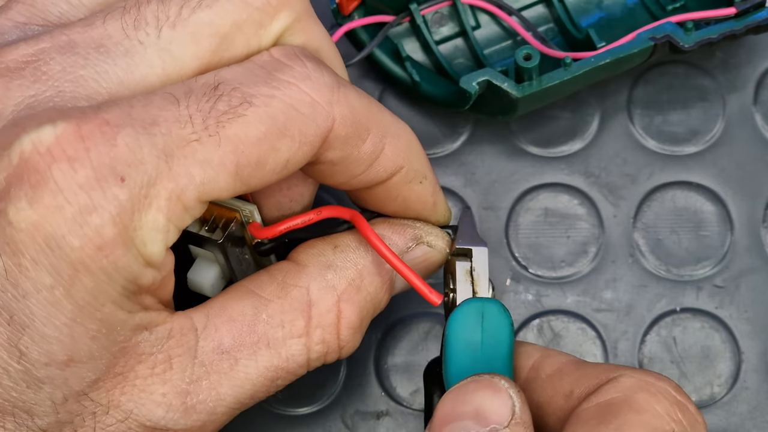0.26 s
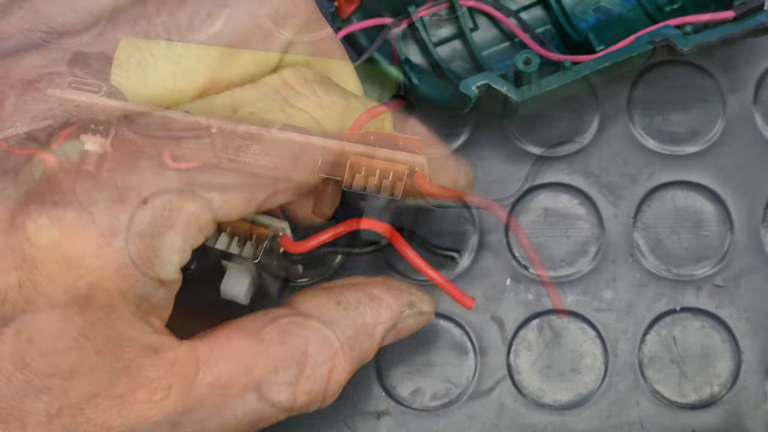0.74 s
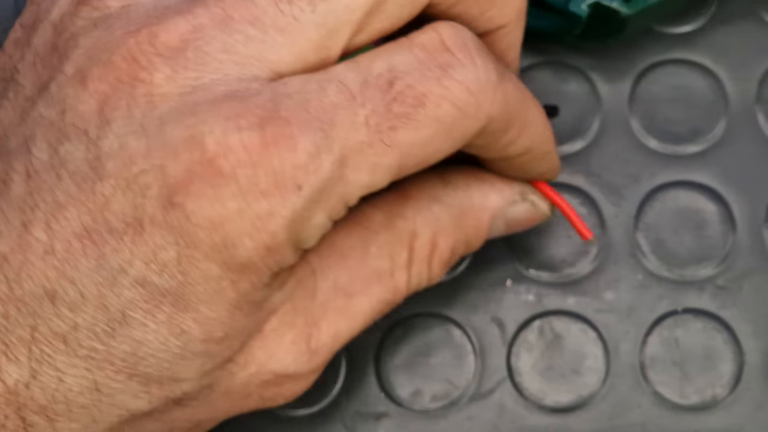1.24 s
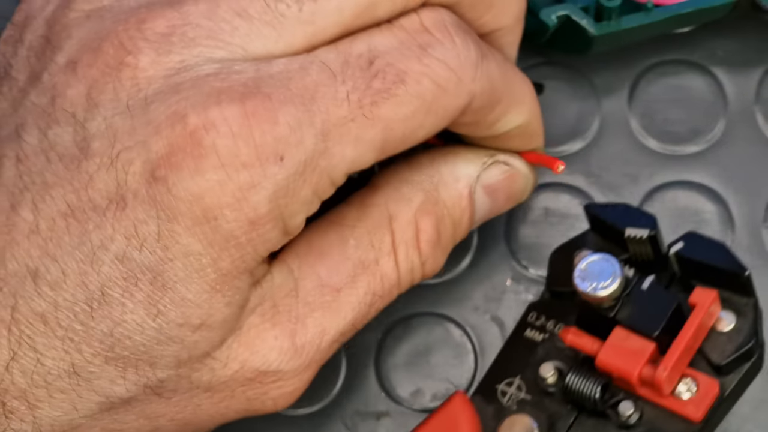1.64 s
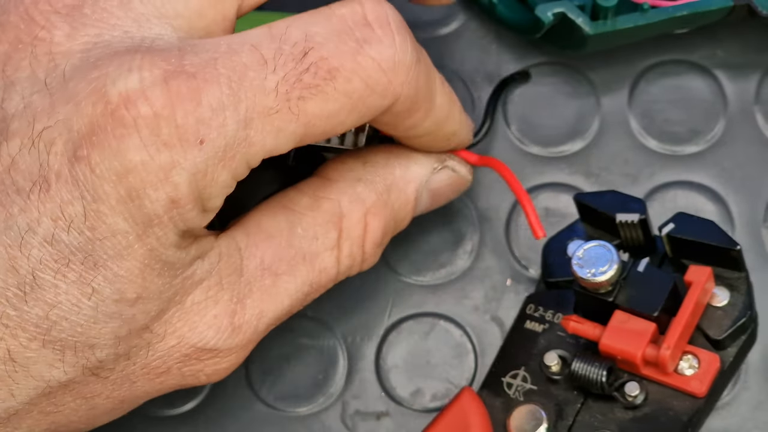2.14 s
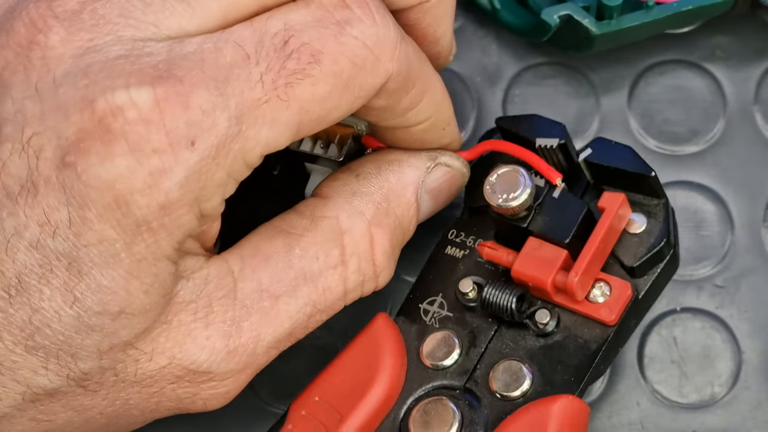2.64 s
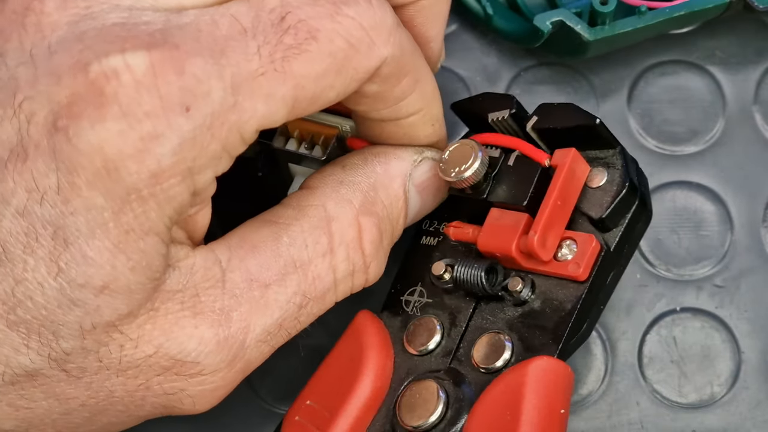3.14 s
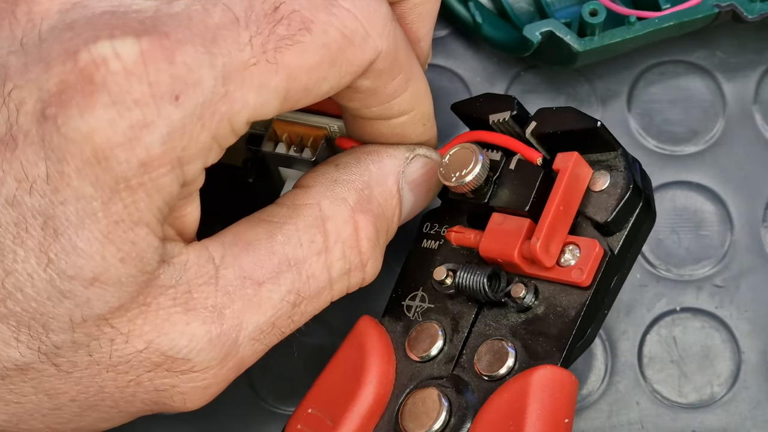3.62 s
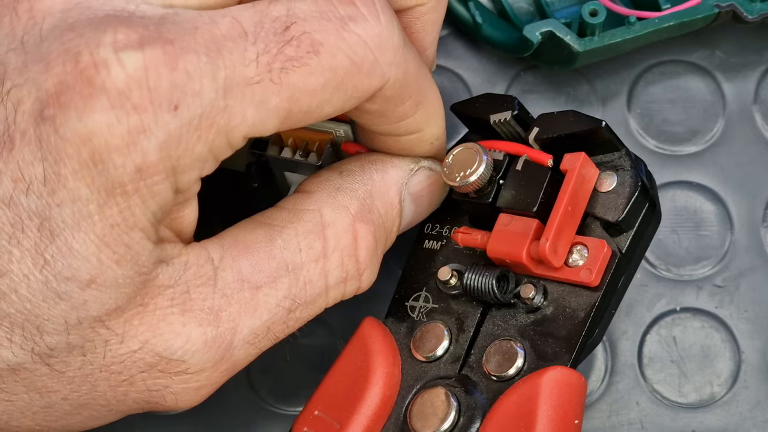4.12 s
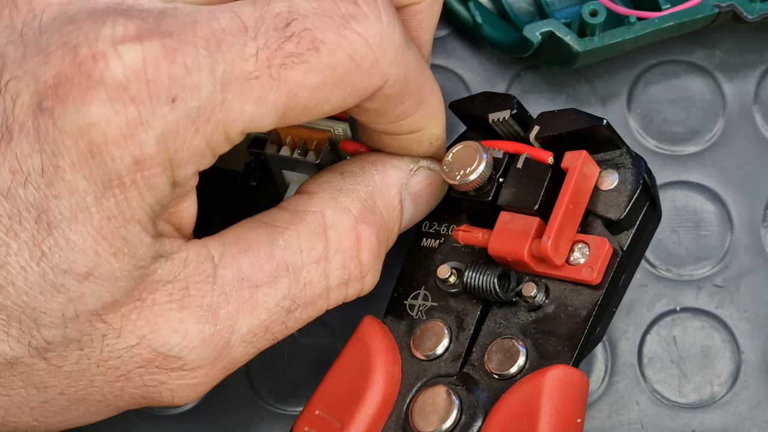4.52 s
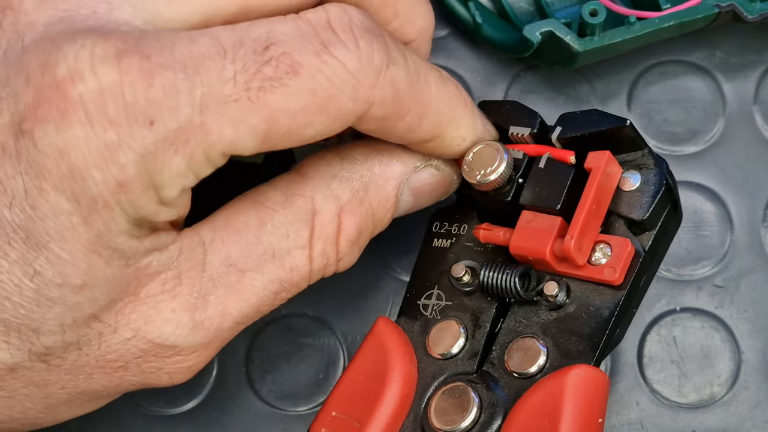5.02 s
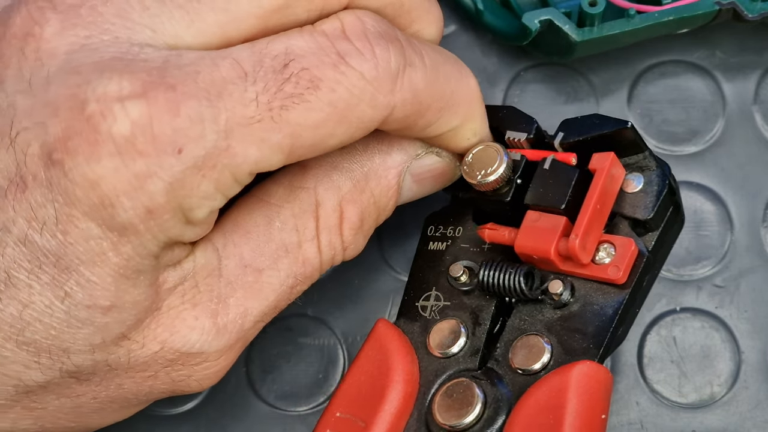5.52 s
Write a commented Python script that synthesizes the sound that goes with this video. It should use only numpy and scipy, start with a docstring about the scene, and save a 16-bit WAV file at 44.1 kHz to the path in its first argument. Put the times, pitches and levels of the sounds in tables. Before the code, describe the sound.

A close stereo recording at a workbench in a small, hard, reverberant room, with a steady low hum, slightly wavering and throbbing, and faint air noise. At about 0.4 s side cutters bite through a lead: a tight, very bright steel snap with a short ringing tail. A dull low thud follows near 0.75 s. From about 1 to 2 s, hands and wire rub over a rubber mat, strongest around 1.4 s, with short scrapes, soft low bumps and light ticks; a firmer tick comes at 1.8 s. Sparse small contacts continue until the stripper's jaws snap shut loudly at 3.1 s. A very faint, thin, gliding two-tone squeal runs from 4.4 to 5 s with slight hand rubbing. Little spring pings sound at 5.0, 5.2 and 5.3 s. At 5.6 s the mechanism releases in a rapid metallic clatter with a low thump and a last click. Loud snaps momentarily pull the background down.

```python
"""Close at a workbench in a small, hard-walled room with a low hum, side cutters snip a lead: hard, ringing noise bursts.
Hands then shift over the rubber mat, with filtered rubbing, low thuds and light ticks, and bring up a wire stripper.
Its jaws snap onto the wire, the insulation squeals in two gliding tones, the spring pings in decaying modes,
and the mechanism lets go with a clatter; each loud snap pulls the recorder's gain down, and it creeps back."""
import sys
import numpy as np
from scipy import signal
from scipy.fft import rfft, irfft, next_fast_len
from scipy.io import wavfile
from scipy.ndimage import uniform_filter1d, map_coordinates

SR = 44100
rng = np.random.default_rng(int(sys.argv[2]) if len(sys.argv) > 2 else 0)


def store_pcm(level_fs):
    """Save levels as 16-bit WAV."""
    pcm = np.round(np.clip(level_fs, -1, 1) * 32767).astype(np.int16)
    wavfile.write(sys.argv[1], SR, np.atleast_2d(pcm).T)


N = 254456  # length in samples

# resonances of the stripper's frame, also heard in light contacts: [f/Hz, width/Hz, level/dB]
FRAME_MODES = [(1340, 84, -9), (2270, 160, -3), (3653, 100, -1.5), (4984, 99, -8.5), (6260, 50, -3.5),
               (7330, 110, 3.5), (8800, 200, -3), (11700, 110, -15.5), (13330, 230, -22.5)]
# likeness of left and right microphone for near sounds: [f/Hz, correlation 0-1]
NEAR_LIKENESS = [(300, 0.8), (1000, 0.86), (2500, .45), (5000, 0), (15000, 0.18)]


def amp(db):
    """Amplitude factor of a level in dB."""
    return 10 ** (np.asarray(db) / 20)


def unit(x):
    """Scale to rms 1."""
    return x / np.sqrt(np.mean(x ** 2) + 1e-20)


def along(points, hz):
    """Read a curve of (Hz, value) points on a logarithmic frequency axis."""
    f, v = np.transpose(points)
    return np.interp(np.log(hz + 1), np.log(f + 1), v)


def curves(rows):
    """One value per sample for each column after the time."""
    s, *cols = np.transpose(rows)
    return [np.interp(np.arange(N) / SR, s, c) for c in cols]


def wobble(rate):
    """A smooth random curve with `rate` random values a second."""
    knots = np.arange(0, N * rate / SR + 1, 1 / 8)
    values = rng.standard_normal(int(knots[-1]) + 4)
    smooth = map_coordinates(values, [knots])
    return np.interp(np.arange(N) * rate / SR, knots, smooth)


def between(start, end, fade):
    """A gate with soft edges, all in seconds."""
    t = np.arange(N) / SR
    return np.clip((t - start) / fade, 0, 1) * np.clip((end - t) / fade, 0, 1)


def swell(peak_s, rise_db_per_s, fall_db_per_s):
    """A movement that grows to its height (gain 1) and ebbs away."""
    t = np.arange(N) / SR - peak_s
    return amp(np.minimum(rise_db_per_s * t, -fall_db_per_s * t))


def jerks(rate, life, size):
    """Stick-slip: sudden random slips, `rate` a second, that each die away over `life` s; rms 1."""
    slips = rng.exponential(size=size) * (rng.random(size) < rate / SR)
    return unit(signal.lfilter([1], [1, -np.exp(-1 / (life * SR))], slips))


def bell(hz, centre, width):
    """Magnitude of one resonance."""
    return 1 / np.sqrt(1 + (2 * (hz - centre) / width) ** 2)


def noise(colour, alike, size):
    """Stereo noise of rms 1 with gain colour(Hz); mid and side shares set the likeness of the channels."""
    m = next_fast_len(size)
    hz = np.fft.rfftfreq(m, 1 / SR)
    turn = np.arccos(np.clip(along(alike, hz), -1, 1)) / 2
    shares = [np.cos(turn), np.sin(turn)]
    spectra = rfft(rng.standard_normal((2, m))) * colour(hz) * shares
    mid, side = irfft(spectra, m)[:, :size]
    return unit(np.array([mid + side, mid - side]))


def rush(spectrum, size=N):
    """Diffuse noise with a given spectrum, arriving from all around the microphones."""
    # likeness of left and right for diffuse sound: [f/Hz, correlation 0-1]
    diffuse_likeness = [(30, .7), (100, 0.74), (300, 0.73), (800, 0.032), (2000, 0), (15000, 0.046)]
    return noise(lambda hz: amp(along(spectrum, hz)), diffuse_likeness, size)


def panned(pan_db):
    """Left and right gains; positive leans left."""
    return amp([[pan_db / 2], [-pan_db / 2]])


def add(out, x, s):
    """Mix x into out from time s on."""
    i = max(round(s * SR), 0)
    out[:, i:i + x.shape[-1]] += x[..., :max(N - i, 0)]


def contacts(rows, spectrum, resonances, gain_db, rise, body_db, halo_db):
    """Steel parts knock together and ring out, damped by the hand: shaped, coloured noise."""
    out, lead = np.zeros((2, N)), 1 / 30
    t = np.arange(SR // 8) / SR - lead
    for s, db, ring_hz, ring_db, knock_db, sizzle_db, pan_db, t60 in rows:
        def colour(hz):
            modes = sum(amp(level) * bell(hz, f, width) ** 2 for f, width, level in resonances)
            body = 1 + amp(body_db) * modes
            ring = 1 + amp(ring_db) * bell(hz, ring_hz, ring_hz * 0.22) ** 2
            knock = knock_db / (1 + (hz / 1800) ** 2)
            sizzle = sizzle_db * hz ** 6 / (hz ** 6 + 9000. ** 6)
            return amp(along(spectrum, hz)) * body * ring * amp(knock + sizzle)
        blow = np.where(t < 0, np.exp(-abs(t) / rise), amp(-60 * abs(t) / t60))
        # a short soft-edged swell of noise around each sharp blow
        halo = np.exp(-abs(t) / np.where(t < 0, .003, .006))
        shape = np.hypot(blow, amp(halo_db) * halo)
        burst = shape * noise(colour, NEAR_LIKENESS, len(t))
        # give both channels the energy of the shape before panning
        burst *= np.linalg.norm(shape) / np.linalg.norm(burst, axis=1, keepdims=True)
        add(out, amp(db + gain_db) * panned(pan_db) * burst, s - lead)
    return out


def echo(s, db, spectrum, pan_db):
    """The room's diffuse answer to a snap: noise that decays by band, the top treble soonest."""
    # reverberation time of the room: [f/Hz, t60/s]
    room_decay = [(500, 0.62), (2000, 0.78), (4300, 0.72), (6000, 0.66), (9000, 0.58), (15000, 0.13)]
    out = np.zeros((2, N))
    hz, t, z = signal.stft(rush(spectrum, size=SR), SR, nperseg=256)
    decay = amp(-60 * t / along(room_decay, hz)[:, None])
    onset = 1 - np.exp(-t / 0.0045)
    tail = signal.istft(z * decay * onset, SR, nperseg=256)[1]
    add(out, amp(db) * panned(pan_db) * tail, s)
    return out


def cutters():
    """The blades bite through the lead and meet: contacts coloured by the steel, then the room."""
    # contacts of the snip: [t/s, relative level/dB, ring f/Hz, ring lift/dB, knock lift/dB, sizzle lift/dB,
    # left minus right/dB, t60/s]
    snip_contacts = [(.4305, -14, 5530, 5.5, -10.5, -4, 12, 0.03),
                     (.4333, -8, 4660, 4.5, -4.5, -2, 17.5, 0.028),
                     (.4364, -2.5, 5550, -1, -7, 3, 12.5, 0.016), (.4408, -1, 4820, -6, 10, 6, -2, 0.0072)]
    # colour of the snip close up: [f/Hz, level/dB]
    snip_colour = [(88, -51), (150, -21.5), (1020, -23), (1450, -17.5), (2270, -8.5), (2870, -18.5),
                   (5460, -7), (6140, -13.5), (8070, -11.5), (8730, -2.5), (9820, -27.5), (12700, -14.5),
                   (15100, -26), (16000, -29)]
    # resonances of the blades: [f/Hz, width/Hz, level/dB]
    blade_modes = [(2550, 130, -8), (4218, 150, -1), (4875, 130, 3), (5532, 430, 4.5), (8530, 200, -1),
                   (10400, 310, -0.5), (15080, 335.7, 3)]
    # colour of the room's answer: [f/Hz, level/dB]
    snip_echo = [(240, -50), (400, -20), (481, -31), (579, -15), (655, -22), (906, -21.5), (1400, -18.5),
                 (2020, -8.5), (2670, -15.5), (4310, -2.5), (5690, -11.5), (8110, -12), (12900, -15),
                 (14600, 2), (16000, -27)]
    snip = contacts(snip_contacts, snip_colour, blade_modes,
                    gain_db=5.5, rise=0.00054, body_db=0.5, halo_db=-11.5)
    return snip + echo(.44, -6.0, snip_echo, pan_db=1)


def stripper():
    """The jaws clamp the wire; later the levers fly back, and both blows excite frame and room."""
    # contacts of the closing jaws, then of the release: [t/s, relative level/dB, ring f/Hz, ring lift/dB,
    # knock lift/dB, sizzle lift/dB, left minus right/dB, t60/s]
    grip_contacts = [(3.1045, -11.5, 2300, 10, -8, -3.5, 5.7, 0.01),
                     (3.106, -7.5, 2424, 33, -3, -3, 1, 0.0098),
                     (3.1098, -10.5, 4900, 4, 0.5, -8.5, 5.9, 0.018),
                     (3.113, -6, 3740, 1.6, 2.5, 2.5, 5, 0.031)]
    release_contacts = [(5.6233, -2.5, 6213, 15.2, 0.5, -3, 2.7, .013),
                        (5.635, -12.5, 2235, 3, 5.5, -2.5, 1, .018),
                        (5.6385, -8, 5155, 8, -3.5, -2, 7, .012), (5.6453, -4.5, 7850, 2, 1, 7, 2, 0.018),
                        (5.6495, -10, 3206, 6.7, 1.5, -1, 3.6, 0.022),
                        (5.6575, -10, 3520, 4.85, -2, -1.5, 2.7, 0.024)]
    # colours of jaws and levers close up: [f/Hz, level/dB]
    jaw_colour = [(88, -59.5), (150, -35.5), (716, -16), (941, -20.5), (1340, -7), (1870, -21.5),
                  (2450, -5.5), (2760, -11), (3770, -5.5), (7180, -4.5), (11300, -19), (14800, -14.5),
                  (16000, -17)]
    lever_colour = [(180, -46), (300, -25), (961, -14.5), (1230, -8), (1690, -3.5), (1870, -9.5),
                    (3190, -8), (3950, -13), (5430, -3.5), (12100, -13.5), (13100, -12), (15000, -11.5),
                    (16000, -19.5)]
    # colours of the room's answers to them: [f/Hz, level/dB]
    grip_echo = [(350, -67), (600, -26.5), (931, -27.5), (1260, -18.5), (1680, -17), (2070, -6), (2540, -6),
                 (4520, -9), (5710, -14), (7410, -11.5), (12000, -23), (14700, -12.5), (16000, -28)]
    release_echo = [(350, -45), (600, -26), (894, -31), (1450, -5.5), (1900, -10), (2150, -3), (2650, -10),
                    (5870, -12.5), (11200, -18.5), (14100, -7.5), (15400, -18), (16000, -41.5)]
    grip = contacts(grip_contacts, jaw_colour, FRAME_MODES,
                    gain_db=7, rise=0.0011, body_db=2, halo_db=-10)
    release = contacts(release_contacts, lever_colour, FRAME_MODES,
                       gain_db=5.0, rise=0.00068, body_db=-5, halo_db=-9.5)
    grip_tail = echo(3.113, -27.0, grip_echo, pan_db=2.5)
    release_tail = echo(5.645, -22, release_echo, pan_db=1.5)
    return grip + release + grip_tail + release_tail


def spring():
    """The coil slips on its hook: a crack and decaying modes, the lowest of which sings on."""
    # slips of the spring: [t/s, relative level/dB, tilt/(dB per octave), singing level/dB]
    pings = [(4.996, -22, -4.5, -51), (5.2031, -27, 2.5, -39), (5.309, -42.5, -5, -46.5)]
    # modes of the coil: [f/Hz, level before tilt and scatter/dB, t60/s]
    coil_modes = [(1686, -11, .09), (2360, -10.5, .06), (2510, -12.5, .06), (3430, -4.5, .03),
                  (3532, -1, 0.05), (3720, 0.5, 0.018), (4210, -11.5, 0.019), (4780, -16.5, 0.0499),
                  (5200, -12.5, 0.029), (5476, -9, .03), (6200, -17, 0.033), (7500, -24, .03)]
    sing_attack_s, sing_t60_s = 0.0044, 0.23
    out, sing, t = np.zeros((2, N)), np.zeros((1, N)), np.arange(SR // 2) / SR
    lowest_hz = coil_modes[0][0]
    for s, db, tilt_db, sing_db in pings:
        ring = 0
        for hz, level, t60 in coil_modes:
            mode_db = level + tilt_db * np.log2(hz / lowest_hz) + rng.normal(0, 1)
            ring = ring + amp(mode_db - 60 * t / t60) * np.sin(2 * np.pi * (hz * t + rng.random()))
        crack_noise = noise(lambda hz: bell(hz, 4100, 4500) ** 3, NEAR_LIKENESS, len(t))
        crack = amp(-10.5 - 60 * t / 0.016) * crack_noise
        onset = 1 - np.exp(-t / 0.00045)
        add(out, amp(db - 6.5) * panned(15) * (ring + crack) * onset, s)
        add(sing, amp(sing_db - 60 * t / sing_t60_s) * (1 - np.exp(-t / sing_attack_s)), s)
    tone = np.sin(2 * np.pi * np.cumsum(lowest_hz + 5 * wobble(50)) / SR)

    def buzz_colour(hz):
        return sum(amp(level) * bell(hz, f, 3.5 / t60) ** 2 for f, level, t60 in coil_modes)
    # the turns buzz against each other and keep the higher modes faintly alive
    buzz = noise(buzz_colour, NEAR_LIKENESS, N)
    return out + sing * panned(4) * (tone + amp(-11) * buzz)


def insulation():
    """The sleeve squeals faintly in two unsteady tones as it is drawn off the copper."""
    # pitch of the lower tone: [t/s, f/Hz]
    squeal_pitch = [(4.42, 5500), (4.63, 5950), (4.68, 6850), (4.72, 6950), (4.78, 6330), (4.88, 6240),
                    (4.93, 5620), (5.0, 5430)]
    squeal_db = -70
    hz, = curves(squeal_pitch)
    phase = 2 * np.pi * np.cumsum(hz * (1 + 0.00075 * wobble(90))) / SR
    level = amp(squeal_db + 2.9 * wobble(30)) * between(4.38, 5.02, .14)
    upper = amp(-8 + 3.3 * wobble(5.4)) * np.sin(1.16 * phase)
    return level * (np.sin(phase) + upper)


def ticks():
    """Tool and wire touch lightly; small parts ring higher, brighter and shorter."""
    # light contacts: [t/s, relative level/dB, ring f/Hz, ring lift/dB, knock lift/dB]
    touches = [(0.962, -30.5, 8923, 13.5, -14), (1.272, -33, 13100, 15, -16),
               (1.5057, -22.5, 6456, 5.5, -21), (1.7885, -17, 3430, 0, 19), (2.039, -30, 3400, 6.5, 4),
               (2.175, -35.5, 5680, 5, -5.5), (2.196, -32, 6350, 4, -30), (2.372, -30.5, 6000, -11, -16),
               (2.472, -37, 3020, 6, 0), (2.704, -37.5, 9000, -13, -3), (2.856, -30.5, 2980, 7.5, 0),
               (3.002, -32, 3150, 14, -3), (4.734, -31, 2980, 0, 12), (5.051, -37, 7500, 9, -9),
               (5.5218, -26.5, 5250, 32, -13.5), (5.745, -10.5, 2948, 13.5, -7)]
    # their colour close up: [f/Hz, level/dB]
    light_colour = [(200, -16), (500, -0.5), (1200, -3), (3200, 6.5), (6000, 6), (8500, -8.5),
                    (11000, -20.5), (15000, -11)]
    middling_hz, middling_t60_s = 3460, 0.054
    shortening = .55  # power of pitch by which the ring shortens
    sizzle_db_per_octave, pan_db = 6.5, 5
    rows = []
    for s, db, hz, ring_db, knock_db in touches:
        sizzle_db = sizzle_db_per_octave * np.log2(hz / middling_hz)
        t60 = middling_t60_s * (middling_hz / hz) ** shortening
        rows.append((s, db, hz, ring_db, knock_db, sizzle_db, pan_db, t60))
    return contacts(rows, light_colour, FRAME_MODES,
                    gain_db=-11, rise=0.00019, body_db=2, halo_db=-9.5)


def bench():
    """Low thuds at the bench, and a few low swells of the drone: a decaying tone with two bands of noise."""
    # low thuds and swells: [t/s, relative level/dB, f/Hz, t60/s]
    lows = [(.738, -7, 259.4, 0.078), (.745, -18.5, 105.3, 0.34), (.777, -18, 163.3, 0.26),
            (1.107, -29, 104, 0.18), (1.167, -25, 117, 0.16), (1.293, -29, 186, 0.35),
            (1.369, -29, 79.5, 0.13), (1.643, -26, 107, 0.17), (1.788, -30.5, 326, 0.12),
            (2.261, -32.5, 210.5, 0.17), (2.535, -41, 180, 0.23), (5.644, -14.5, 82, 0.16),
            (5.693, -24.5, 121, 0.25)]
    out, t = np.zeros((2, N)), np.arange(SR // 2) / SR
    onset = 1 - np.exp(-t / 0.0033)
    for s, db, low_hz, t60 in lows:
        def long_colour(hz):
            return bell(hz, low_hz, low_hz * 0.82) ** 2 * hz / (hz + 80)

        def brief_colour(hz):
            return bell(hz, low_hz * 1.1, low_hz * 0.9) ** 2
        long_noise = noise(long_colour, NEAR_LIKENESS, len(t))
        brief_noise = noise(brief_colour, NEAR_LIKENESS, len(t)) * amp(-60 * t / 0.051)
        tone = np.sin(2 * np.pi * low_hz * t)
        body = (.85 * tone + 0.74 * long_noise) * amp(-60 * t / t60)
        add(out, amp(db - 1.5) * onset * (body + brief_noise), s)
    return out


def drags():
    """The wire drags over the mat's studs, catching and slipping in quick, uneven jerks."""
    # strokes of the wire: [t/s, level/dB, length/s, f/Hz]
    strokes = [(1.29, -44, .06, 1700), (1.402, -36, .03, 1150), (1.438, -41, .026, 900)]
    out, t = np.zeros((2, N)), np.arange(SR // 5) / SR
    for s, db, length, drag_hz in strokes:
        # the stroke is strongest half a length after it starts
        stroke = 2 * t / length * np.exp(1 - 2 * t / length)
        stick_slip = unit(.5 + jerks(1500, 0.0023, size=len(t)))
        rasp = noise(lambda hz: bell(hz, drag_hz, drag_hz * 1.2) ** 3, NEAR_LIKENESS, len(t))
        add(out, amp(db) * stroke * stick_slip * rasp, s)
    return out


def hands():
    """Skin and wire rub over the mat in one sweep of grainy noise, then fingers tighten on the handles."""
    # colours of the weight on the mat, the rubbing and its hiss: [f/Hz, level/dB]
    rumble_colour = [(12, -38.5), (20, 0), (59, -7.5), (103, -1.5), (151, -7), (245, -6), (290, -5.5),
                     (409, -13), (600, -10.5), (780, -48.5), (1320, -120)]
    rub_colour = [(210, -27), (350, -1), (480, -8.5), (737, -3.5), (799, -6.5), (960, -9), (1110, -9),
                  (1230, -6.5), (1340, -6), (1850, -7), (2170, -3.5), (2550, -11), (3100, -10.5),
                  (4000, -24.5), (5200, -44.5), (8800, -120)]
    hiss_colour = [(1470, -21.5), (2500, -17.5), (3490, -3.5), (3770, -5.5), (4880, -8.5), (6860, -9.5),
                   (7530, -7), (11300, -23.5), (14900, -17), (16000, -28.5)]
    sweep = swell(1.416, rise_db_per_s=25, fall_db_per_s=20)
    weight = swell(1.165, rise_db_per_s=50, fall_db_per_s=10.5)  # the hand bears on the mat
    press = swell(4.8, rise_db_per_s=30.5, fall_db_per_s=25)  # the fingers press on the handles
    grain = unit(1 + .45 * jerks(200, .004, size=N))
    rumble = amp(-42 + 2.5 * wobble(24.85)) * weight * rush(rumble_colour)
    rub = amp(-40.0 + 0.86 * wobble(45)) * sweep * grain * rush(rub_colour)
    hiss = amp(-45.5 + .6 * wobble(120)) * sweep * rush(hiss_colour)
    squeeze = amp(-57.5 + 1.22 * wobble(22)) * press * rush(rub_colour)
    return panned(3.4) * ((rumble + rub + hiss) * between(0.74, 3.4, .05) + squeeze)


def hum():
    """A wavering tone over a throbbing drone and the steady noise of the room."""
    # colour of the room noise: [f/Hz, level/dB]
    air_colour = [(12, -40.5), (20, -9.5), (63, -22), (79, -13.5), (101, -3.5), (150, -20.5), (262, -20),
                  (301, -12), (328, -18), (367, -15), (422, -28), (527, -20), (825, -31), (1710, -33),
                  (3200, -39), (8000, -45.5), (10000, -60), (13000, -51), (16000, -53)]
    hum_hz, hum_db = 298.2, -51
    drone_hz, drone_db = 95.8, -50.5
    throb_per_s, throb_db = 6, 3  # throb_db: swing up and down
    air_db = -46
    throb = throb_db * np.sin(2 * np.pi * throb_per_s * np.arange(N) / SR + wobble(0.94))
    tone_level = amp(hum_db + 0.75 * wobble(14))
    tone = tone_level * unit(np.sin(2 * np.pi * np.cumsum(hum_hz + 2.5 * wobble(16)) / SR))
    drone_level = amp(drone_db + throb + 2.2 * wobble(22))
    drone = drone_level * unit(np.sin(2 * np.pi * np.cumsum(drone_hz + 7 * wobble(24)) / SR))
    return panned(0.67) * (tone + drone + amp(air_db) * rush(air_colour))


def turned_down(x):
    """dB by which the gain control backs off: at once for a loud sound, returning slowly."""
    ceiling_db, recover_db_per_s = -16.5, 3  # short-term level where it acts; speed of its return
    detector_s = .02
    power = abs(uniform_filter1d(np.mean(x ** 2, axis=0), int(detector_s * SR)))
    excess_db = np.maximum(10 * np.log10(power + 1e-20) - ceiling_db, 0)
    recovered_db = recover_db_per_s * np.arange(N) / SR
    return np.maximum.accumulate(excess_db + recovered_db) - recovered_db


def scene():
    """All sources at the bench, from the main ones to the background."""
    tools = cutters() + stripper() + spring() + insulation()
    handling = ticks() + bench() + drags() + hands()
    return tools + handling + hum()


def record(dry):
    """Blend from one gain control to the next after the snip, round the highest peaks, limit the band."""
    blend_start_s, blend_length_s = 0.77, 0.45
    cutting_gain_db = -4  # the cutting is set a little lower than the stripping
    top_hz = 15850
    blend = np.clip((np.arange(N) / SR - blend_start_s) / blend_length_s, 0, 1)
    cutting_db = cutting_gain_db - turned_down(amp(cutting_gain_db) * dry * (1 - blend))
    stripping_db = -turned_down(dry * blend)
    level = dry * amp((1 - blend) * cutting_db + blend * stripping_db)
    rounded = level / (1 + abs(level / .95) ** 6) ** (1 / 6)
    m = next_fast_len(N + SR // 2)
    passed = np.fft.rfftfreq(m, 1 / SR) < top_hz
    return irfft(rfft(rounded, m) * passed, m)[:, :N]


dry = scene()
out = record(dry)
store_pcm(out)
```